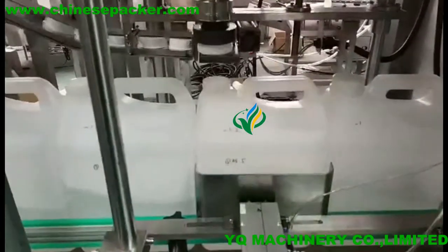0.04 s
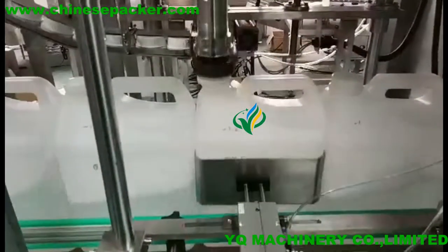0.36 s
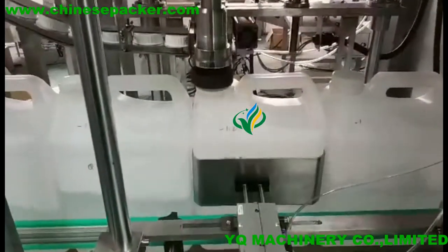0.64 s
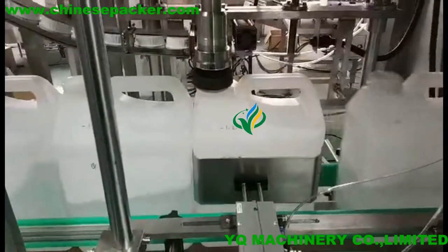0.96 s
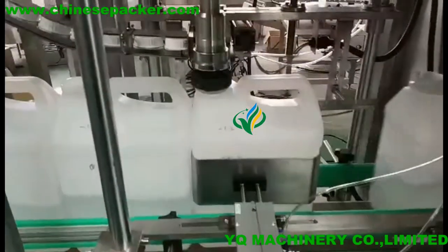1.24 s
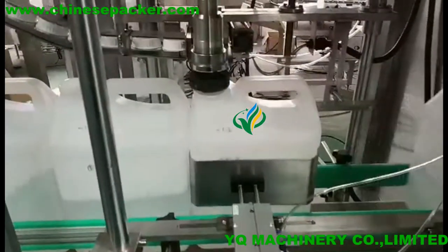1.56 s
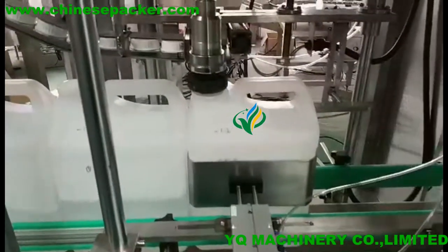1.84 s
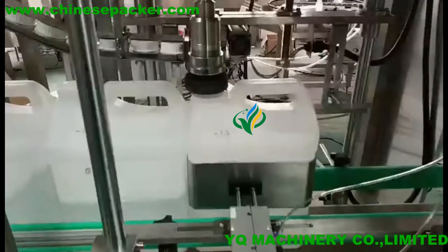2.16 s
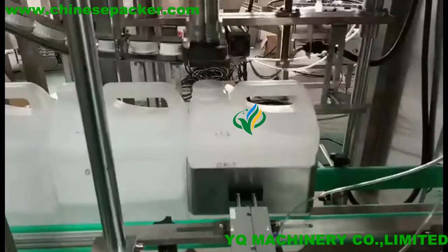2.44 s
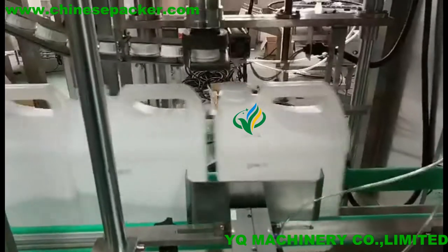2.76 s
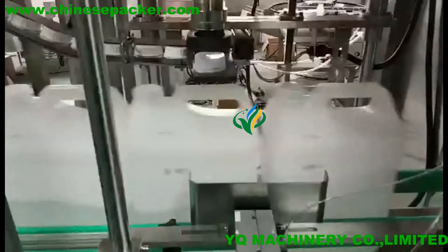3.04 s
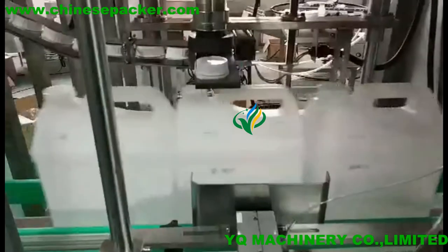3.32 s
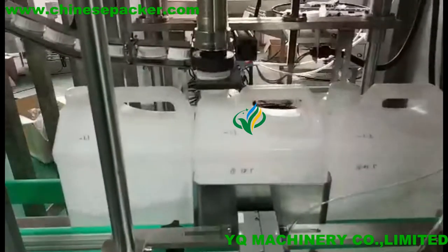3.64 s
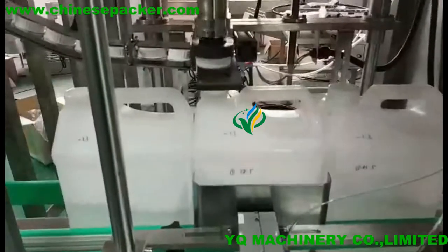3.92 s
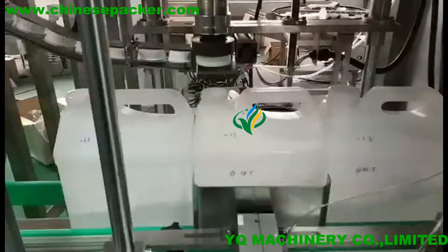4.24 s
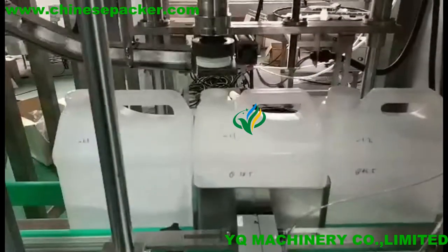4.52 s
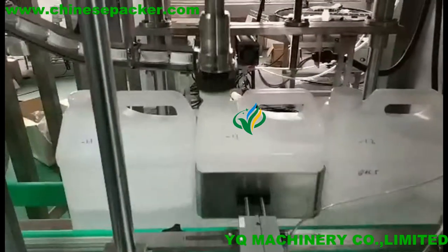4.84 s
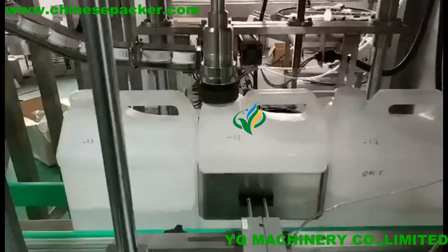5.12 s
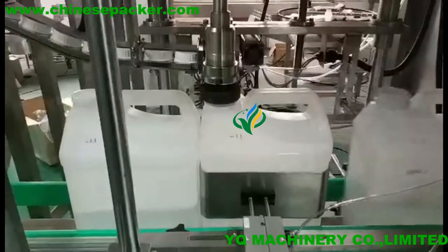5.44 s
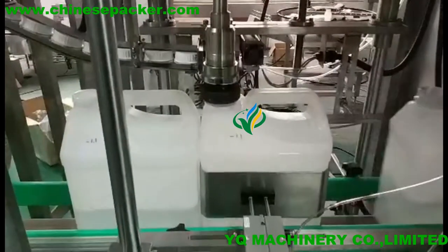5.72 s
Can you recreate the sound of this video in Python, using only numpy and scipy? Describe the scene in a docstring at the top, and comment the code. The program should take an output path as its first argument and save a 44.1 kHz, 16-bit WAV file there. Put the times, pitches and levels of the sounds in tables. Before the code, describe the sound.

A capping machine hisses with short air blasts and knocks against hollow plastic jugs over a humming, rattling conveyor.

```python
"""Pneumatic jug capper, close up

Valves vent one after another through their mufflers, cylinders knock against their stops and the hollow
plastic jugs, and the chuck whirs a cap tight, then squeaks free. The factory conveyor hums and taps
underneath, ducked by the recorder's gain control at each loud sound and swelling back in the pauses."""
import sys
import numpy as np
from scipy import signal
from scipy.fft import rfft, irfft
from scipy.io import wavfile
from scipy.ndimage import uniform_filter1d, map_coordinates

SR = 44100
rng = np.random.default_rng(int(sys.argv[2]) if len(sys.argv) > 2 else 0)


def bounce(signal):
    """Save signal as a 16-bit WAV file at the path given by the first command-line argument."""
    frames = np.transpose(np.atleast_2d(signal))
    limited = np.clip(frames, -1, 1)
    pcm = np.round(limited * 32767).astype(np.int16)
    wavfile.write(sys.argv[1], SR, pcm)


N = 263718
TIME = np.arange(N) / SR
FREQS = np.maximum(np.fft.rfftfreq(N, 1 / SR), 1)


def from_db(db):
    return 10 ** (np.asarray(db) / 20)


def unit_rms(x):
    return x / np.sqrt(np.mean(x ** 2) + 1e-20)


def eq_curve(points):
    """Join (Hz, dB) points into a level in dB at every frequency."""
    hz, db = np.transpose(points)
    return np.interp(np.log(FREQS), np.log(hz), db)


def drift(rate_hz):
    """Smooth random wavering with rms 1."""
    knots = np.arange(0, N, SR / rate_hz / 2)
    return unit_rms(np.interp(np.arange(N), knots, rng.standard_normal(N)[:len(knots)]))


def bandpass(x, low_hz, high_hz):
    sos = signal.butter(2, [low_hz, min(high_hz, .45 * SR)], "band", fs=SR, output="sos")
    return signal.sosfilt(sos, x)


def add(track, start_s, sound):
    """Mix in whatever part of a sound falls within the track."""
    start = round(start_s * SR)
    if -len(sound) < start < N:
        track[max(start, 0):start + len(sound)] += sound[max(-start, 0):N - start]


def ring(force, hz, t60):
    """One mode: a unit click sets a sine of height 1 ringing."""
    r, w = from_db(-60 / (t60 * SR)), 2 * np.pi * hz / SR
    return signal.lfilter([0, np.sin(w)], [1, -2 * r * np.cos(w), r * r], force + 1e-18)


def struck(modes, t60, chatter_s, first_blow, crack_db, band_hz):
    """A blow and its dying chatter ring a set of modes over a dry crack; rms 1 at its loudest."""
    t, (low_hz, high_hz) = TIME[:SR // 3], band_hz
    force = rng.standard_normal(len(t)) ** 3 * np.exp(-t / chatter_s)
    force[0] += first_blow
    rings = 0
    for hz, db in modes:
        gain = from_db(db + rng.normal(0, 3.7)) * rng.choice([-1, 1])
        rings += gain * ring(force, hz * rng.normal(1, 0.028), t60)
    crack = from_db(crack_db) * unit_rms(bandpass(force, low_hz, high_hz))
    hit = bandpass(unit_rms(rings), low_hz / 2, 2 * high_hz) + crack
    return hit / np.sqrt(uniform_filter1d(hit ** 2, size=441).max())


# Stereo image of the noise layers. Each row: frequency in Hz, left-right correlation.
STEREO_CORRELATION = [(90, .88), (170, .997), (400, .985), (3800, .997), (5500, .94), (8000, .78)]


def noise(colour_db):
    """Coloured stereo noise, wider in the treble; rms 1."""
    mid, side = rfft(rng.standard_normal((2, N)))
    alike = np.clip(eq_curve(STEREO_CORRELATION), 0, 1)
    stereo = np.sqrt(1 + alike) * mid + np.sqrt(1 - alike) * side * [[1], [-1]]
    return unit_rms(irfft(from_db(colour_db) * stereo, N))


def turbulence(x, depth_db, patch_hz, patch_s):
    """Patches of the spectrum swell and fade, each on its own; rms 1."""
    bins = signal.stft(x, nperseg=512)[2]
    row, frame = np.indices(bins.shape[1:])
    hz, s = row * SR / 512, frame * 256 / SR
    grid = rng.standard_normal((128, 512))
    patches = map_coordinates(grid, [hz / patch_hz, s / patch_s], order=1, mode="wrap")
    return unit_rms(signal.istft(bins * from_db(depth_db * unit_rms(patches)))[1][:, :N])


def hall(x, t60=0.11, predelay_s=.008):
    """A diffuse, dull tail from the factory walls, different in each ear."""
    t = TIME[:SR]
    decay = from_db(-60 * t / t60) * (t > predelay_s)
    mid, side = bandpass(rng.standard_normal((2, SR)), 133, 9700) * decay
    tail = mid + .5 * side * [[1], [-1]]
    return signal.fftconvolve(x, tail / np.sqrt(np.sum(tail[0] ** 2)), axes=1)[:, :N]


def jug_shake(knock_db=-24, settle_s=0.13, chuck_db=-10.0, scuff_db=-6):
    """Envelope: the jugs settle after each knock, judder under the chuck and jostle as they slide."""
    shake = from_db(chuck_db) * chuck_drive() + from_db(scuff_db) * slide_speed()
    for start, _, db in KNOCKS:
        add(shake, start, from_db(db + knock_db) * np.exp(-TIME[:SR] / settle_s))
    return shake


# The bed: low jug drone and bright link rattle. Each row: frequency in Hz, level in dB.
DRONE_EQ = [(40, -29), (100, -37), (145, -16.5), (185, -3.5), (225, 7.5), (270, -0.5), (350, -8),
            (480, -17.5), (900, -26.5)]
RATTLE_EQ = [(180, -20), (300, -2.5), (510, 0), (599, -2.5), (715, 1.5), (881, -4), (1450, -7.5),
             (3240, -6), (4540, -9.5), (6580, -28), (9830, -13.5), (14000, -26)]


def conveyor(drone_db=-36.0, rattle_db=-28, shaken_rattle_db=-11, throb_db=3.5, grain_db=1.2):
    """Empty jugs drone on the belt while its links rattle; both swell when the jugs are shaken."""
    shake = jug_shake()
    drone_level = np.hypot(from_db(drone_db), shake) * from_db(throb_db * drift(14))
    drone = noise(eq_curve(DRONE_EQ))
    rattle = turbulence(noise(eq_curve(RATTLE_EQ)), depth_db=1.3, patch_hz=180, patch_s=.03)
    rattle_level = np.hypot(from_db(rattle_db), from_db(shaken_rattle_db) * shake)
    return drone_level * drone + rattle_level * from_db(grain_db * drift(60)) * rattle


# Modes of a jug wall, shared by taps, scuffs and knocks. Each row: frequency in Hz, level in dB.
JUG_MODES = [(515, 0), (557.5, 7), (684, 7.5), (729, 3.5), (905, 5.5), (1005, 1), (1252, 2), (1510, -0.5),
             (1692, 2), (1970, -10.5), (400, 1.5), (296, 6.5)]
# With the clamp open the jugs ride free and tap harder: start and end in seconds, boost in dB.
RIDING_FREE = (2.4, 3.4, 4.9)


def link_taps(first_s=.002, every_s=.1263, tap_db=-24.0, uneven_db=2.0, yield_s=0.0086):
    """Each passing belt link taps the jugs softly on the rails, waking only their middle modes."""
    out, (freed, held, boost_db) = np.zeros(N), RIDING_FREE
    for start in np.arange(first_s, N / SR, every_s):
        tap = struck(JUG_MODES[:4], t60=0.081, chatter_s=0.013, first_blow=3.6,
                     crack_db=-7.5, band_hz=(360, 1000))
        db = tap_db + boost_db * (freed < start < held) + rng.normal(0, uneven_db)
        attack = 1 - np.exp(-TIME[:len(tap)] / yield_s)
        add(out, start, from_db(db) * tap * attack)
    return out


# Jugs scuff along as the clamp closes, the chuck lets go or the row moves up.
# Each row: start in seconds, length in seconds, level in dB.
SCUFFS = [(0.418, 0.36, -13.5), (2.033, 0.17, -14.5), (3.274, 0.37, -14), (4.956, 0.36, -13.5)]


def slide_speed():
    """Speed of the jugs against the rails: each scuff swells and eases off."""
    speed = np.zeros(N)
    for start, length, db in SCUFFS:
        add(speed, start, from_db(db) * np.sin(np.pi * TIME[TIME < length] / length))
    return speed


def scuffs(snags_per_s=260, t60=0.037, clatter_db=-8, rub_db=-9, rub_hz=(600, 2600)):
    """A sliding jug rubs and snags; the snags make its walls clatter."""
    snags = (rng.random(N) < snags_per_s / SR) * rng.standard_normal(N)
    clatter = sum(from_db(db) * rng.choice([-1, 1]) * ring(snags, hz, t60) for hz, db in JUG_MODES)
    rub = bandpass(rng.standard_normal(N), *rub_hz)
    return slide_speed() * (from_db(clatter_db) * unit_rms(clatter) + from_db(rub_db) * unit_rms(rub))


def stick_slip(curve, jitter, rough_db, partials):
    """A wavering friction tone along a curve; each partial is a pitch multiple and a level in dB."""
    times, pitches, levels = np.transpose(curve)
    hz, db = np.interp(TIME, times, pitches), np.interp(TIME, times, levels)
    phase = 2 * np.pi * np.cumsum(hz * (1 + jitter * drift(400))) / SR
    tone = sum(from_db(level) * np.sin(k * phase + rng.uniform(0, 2 * np.pi)) for k, level in partials)
    gate = uniform_filter1d(1.0 * ((TIME > times[0]) & (TIME < times[-1])), size=300)
    return gate * from_db(db + rough_db * drift(70)) * unit_rms(tone)


# The seal's gliding voice and its steady upper ring, both played slightly flat.
# Each row: time in seconds, pitch in Hz before detuning, level in dB.
SEAL_GLIDE = [(2.35, 2200, -31), (2.41, 2430, -23), (2.448, 2030, -20), (2.48, 1450, -29), (2.55, 750, -33)]
SEAL_RING = [(2.38, 4620, -21), (2.55, 4550, -25), (2.61, 4500, -32.5)]


def seal_rasp():
    """The seal of the rising cylinder sings; uneven grip spreads each tone into a narrow rush."""
    glide = stick_slip(SEAL_GLIDE, jitter=0.0613, rough_db=2.5, partials=[(0.96, 0)])
    upper = stick_slip(SEAL_RING, jitter=0.016, rough_db=-0.5, partials=[(0.98, 0)])
    return (glide + upper) * drift(260)


# The chuck's squeak, played slightly flat.
# Each row: time in seconds, pitch in Hz before detuning, level in dB.
SQUEAK = [(2.06, 4920, -26), (2.082, 5010, -3), (2.097, 5080, -20), (2.205, 5020, -23.5),
          (2.225, 4880, -32)]
# The jug's groan. Each row: time in seconds, slips per second, level in dB.
GROAN = [(2.184, 186, -12), (2.206, 187, -6.5), (2.245, 178, -19)]
# The groan's timbre. Each row: harmonic number, level in dB.
GROAN_PARTIALS = [(1, -10), (2, -8.5), (3, 6), (4, 0), (5, -2.5), (6, -8)]


def chuck_slip():
    """The chuck squeaks off the cap, and the jug wall groans as it slips."""
    squeak = stick_slip(SQUEAK, jitter=0.0207, rough_db=5, partials=[(0.98, 0)])
    groan = stick_slip(GROAN, jitter=0.026, rough_db=0.5, partials=GROAN_PARTIALS)
    return squeak + groan


# One spin of the chuck per jug. Each row: start in seconds, length in seconds, level in dB.
SPINS = [(0.742, 0.317, -20), (5.239, 0.175, -19)]
# The thread catches at the start, midway and when tight. Each entry: fraction of the spin.
THREAD_CATCHES = [0, 0.505, 0.925]


def chuck_drive(catch_db=4.0, catch_s=0.039, stop_s=0.012):
    """Friction envelope: it swells at each catch of the thread and ends when the cap is tight."""
    drive, t = np.zeros(N), TIME[:SR]
    for start, length, db in SPINS:
        moments = np.multiply(THREAD_CATCHES, length)
        catches = sum((t > at) * np.exp(-np.abs(t - at) / catch_s) for at in moments)
        release = np.exp(-np.maximum(t - length, 0) / stop_s)
        add(drive, start, from_db(db) * (1 + from_db(catch_db) * catches) * release)
    return uniform_filter1d(drive, size=700)


# Colour of the chuck's whir. Each row: frequency in Hz, level in dB.
CHUCK_EQ = [(410, -55), (700, -14), (965, -3.5), (2990, -5.5), (3970, -2.5), (5540, -10), (6390, -17.5),
            (12000, -18), (15600, -47), (22000, -120)]


def chuck_whir(grain_db=3.5, clinks_per_s=28, t60=0.12, clink_db=-3, grind_db=-5, modes=40):
    """The spinning chuck grinds the cap down its thread; each mode of its steel clinks at random."""
    colour, clinks = eq_curve(CHUCK_EQ), 0
    for hz in np.geomspace(900, 7000, modes) * rng.normal(1, 0.0125, modes):
        touches = np.zeros(N)
        moments = np.cumsum(rng.exponential(SR / clinks_per_s, size=200)).astype(int)
        touches[moments[moments < N]] = rng.standard_normal(size=200)[moments < N]
        clinks += from_db(np.interp(hz, FREQS, colour)) * np.sqrt(hz) * ring(touches, hz, t60)
    grind = turbulence(noise(colour), depth_db=6.0, patch_hz=232, patch_s=.04)
    grind *= from_db(grain_db * drift(110))
    return chuck_drive() * (from_db(clink_db) * unit_rms(clinks) + from_db(grind_db) * grind)


# Modes of the steel head. Each row: frequency in Hz, level in dB.
STEEL_MODES = [(2430, -0.5), (2750, 5), (2980, 0.5), (3320, 11), (3490, 0), (3990, 10), (4280, 4),
               (4700, -24), (5300, -17)]
# Recipes for a full-face shove on a jug, a glancing slap, a cylinder's end stop, a steel-on-steel
# ring and the chuck's seat on the neck. Each row: thump in dB, thump in Hz, clack in dB, clink in dB.
CONTACTS = {"shove": (2, 216.5, -6.5, -17.5), "slap": (-2, 220.5, 2, -12), "stop": (-6, 224, 0, -2.5),
            "ring": (0, 210, -20, -2), "seat": (-1.5, 327, -11, -1)}
# The hits. Each row: start in seconds, kind of contact, level in dB.
KNOCKS = [(0.518, "stop", -8), (0.549, "slap", -8.5), (0.733, "seat", 0.5), (0.894, "ring", -13),
          (1.842, "stop", -15.5), (2.051, "stop", -8.5), (2.249, "slap", -9), (2.329, "slap", -7),
          (2.591, "shove", 5.5), (2.618, "shove", 1.5), (3.281, "slap", -15), (3.35, "ring", -7),
          (3.485, "shove", 0), (3.517, "shove", -6), (3.562, "ring", -5), (3.755, "slap", -16),
          (3.976, "shove", -2), (4.006, "shove", -2), (4.424, "stop", -7), (4.441, "slap", -9.5),
          (5.051, "slap", -7), (5.126, "slap", 3), (5.233, "seat", 2)]


def knocks(thump_t60=0.061, swell_s=0.018, yield_s=0.0019):
    """A cylinder lands: steel clinks, the jug wall yields and clacks, and the air inside thumps."""
    out, t = np.zeros(N), TIME[:SR // 3]
    thump_envelope = from_db(-60 * t / thump_t60) * (1 - np.exp(-t / swell_s))
    attack = 1 - np.exp(-t / yield_s)
    for start, contact, db in KNOCKS:
        thump_db, thump_hz, clack_db, clink_db = CONTACTS[contact]
        thump = np.sin(2 * np.pi * thump_hz * t) * thump_envelope
        clack = struck(JUG_MODES, t60=0.04, chatter_s=0.012, first_blow=32,
                       crack_db=-2.5, band_hz=(350, 1580))
        clink = struck(STEEL_MODES, t60=0.11, chatter_s=0.0086, first_blow=26,
                       crack_db=0.5, band_hz=(2360, 5830))
        rings = (from_db(clack_db) * clack + from_db(clink_db) * clink) * attack
        add(out, start, from_db(db) * (from_db(thump_db) * thump / np.abs(thump).max() + rings))
    return out


def pipe_ripple(depth_db=5.5, spacing_hz=71.44, fade_hz=10000):
    """Reflections in the pipes and steel frame ripple the spectrum finely, less so at the top."""
    ripple = np.interp(FREQS / spacing_hz, np.arange(2000), rng.standard_normal(2000))
    return depth_db * ripple / (1 + (FREQS / fade_hz) ** 2)


# The air blasts of one cycle. Each row: valve, start in seconds, level in dB, length in seconds,
# drop by the end in dB (negative swells), opening spurt in dB.
BLASTS = [("lower", 0.5134, -1.3, 0.2185, 1.9, -2.4), ("release", 1.81, -9, 0.28, -4.5, 0.87),
          ("lift", 2.26, -9, 0.32, 9.5, 0), ("clamp", 2.604, -9.5, 0.6, 3.3, 9.4),
          ("clamp", 3.276, -17.5, 0.2, -1.1, 0), ("pick", 3.728, -12.5, 0.233, 10.5, 10.6),
          ("grip", 3.979, -6, 0.356, 1, 0), ("slide", 4.416, -1.5, 0.4516, 0, 1)]
# Short, matching puffs of the slide valve. Each entry: start in seconds.
PUFF_STARTS = [2.226, 3.326, 3.546]
PUFF_DB, PUFF_S = -1, 0.044
CYCLE_S = 4.51   # the valves repeat their sequence for every jug


def airflow(valve, open_s=0.017, shut_s=0.021, spurt_s=0.041, trail_db=-17, trail_s=0.27):
    """Envelope of one valve: it spurts open, sags as its cylinder empties and trails off once shut."""
    flow, t = np.zeros(N), TIME[:SR]
    puffs = [("slide", start, PUFF_DB, PUFF_S, 0, 0) for start in PUFF_STARTS]
    attack = np.sin(np.pi / 2 * np.minimum(t / open_s, 1)) ** 2
    for name, start, level_db, length, sag_db, spurt_db in BLASTS + puffs:
        if name == valve:
            since_shut = np.maximum(t - length, 0)
            trail = from_db(trail_db) * np.exp(-since_shut / trail_s)
            release = np.maximum(np.exp(-since_shut / shut_s), trail)
            db = level_db - sag_db * np.minimum(t / length, 1) + spurt_db * np.exp(-t / spurt_s)
            for cycle in (-1, 0, 1):
                add(flow, start + cycle * CYCLE_S, attack * release * from_db(db))
    return flow


# The hiss of air leaving a muffler. Each row: frequency in Hz, level in dB.
MUFFLER_EQ = [(120, -57), (300, -38), (1500.0, -13.5), (2500.0, -10.5), (3700.0, -1), (5000.0, -4.5),
              (6100.0, -11), (8200.0, -12), (10500.0, -3), (11400.0, -1), (12300.0, 4.5), (14000.0, 1.8),
              (17000, 1), (20000, -9)]
# Peaks and notches of each valve's exhaust path. Each row: centre in Hz, width in Hz, gain in dB.
SLIDE = [(4250, 5400, -11), (4300, 420, 8), (7600, 1000, 2.5), (12200, 2100, -6.5), (16300, 3000, 4.5)]
LOWER = [(2770, 1250, -6), (3770, 1600, 4.5), (4970, 3000, -5.5), (8930, 3800, -8.5), (9700, 440, -4),
         (11400, 1000, -13), (13000, 490, -8), (12740, 300, 3.5)]
RELEASE = [(2070, 720, -10), (4980, 680, 4.5), (6060, 320, -9), (11400, 990, -17), (11500, 4100, 8),
           (13650, 520, 9.5)]
LIFT = [(1960, 2200, 8.5), (4620.0, 270, 0), (10300, 420.0, 4), (11640, 1400, 15.5), (11600, 4200, -13)]
CLAMP = [(2000, 980, -44), (5600, 2100, 1.5), (5960, 270, -9), (9130, 460, 4), (9260.0, 3200, -7.5),
         (9790.0, 410, 9), (11320, 620, -22), (14300, 3700, -11.5)]
PICK = [(2320, 1700, 8), (7850, 2300, 4), (10620, 1150, -16), (10630, 1850, 19), (12130.0, 270, 4.5)]
GRIP = [(2850, 1100, 6), (5360, 680, 8.5), (6600, 490, 8.5), (7300, 1300, 6), (10920, 1200, 8.5),
        (11600, 500, -24), (12000, 440, 10), (13200, 480, 8), (13770, 490, 17.5)]
# Each entry: valve name, its exhaust path from above.
VALVES = {"slide": SLIDE, "lower": LOWER, "release": RELEASE, "lift": LIFT, "clamp": CLAMP, "pick": PICK,
          "grip": GRIP}


def exhausts(flutter_db=1.5):
    """Air vents through the mufflers, coloured by each valve's path, sputtering and fluttering."""
    hiss = 0
    for valve, path in VALVES.items():
        path_db = sum(db * np.exp(-(2 * (FREQS - hz) / width) ** 2) for hz, width, db in path)
        hiss += airflow(valve) * noise(eq_curve(MUFFLER_EQ) + path_db + pipe_ripple())
    sputter = turbulence(hiss, depth_db=3.0, patch_hz=240.4, patch_s=.028)
    return np.std(hiss) * sputter * from_db(flutter_db * drift(22))


def scene(hall_db=-29.5):
    """The mix: contacts with a touch of hall, air blasts a hair to the right, conveyor underneath."""
    contacts = knocks() + link_taps() + scuffs() + seal_rasp() + chuck_slip() + chuck_whir()
    pan = from_db([[-.27], [.27]])
    return contacts + from_db(hall_db) * hall(contacts) + pan * exhausts() + conveyor()


def gain_control(x, threshold_db=-22.5, slope=0.48, release_db_per_s=20.0):
    """Loud sounds duck the gain at once; it creeps back up, so the conveyor swells in the pauses."""
    power = np.abs(uniform_filter1d(np.mean(x ** 2, axis=0), size=600))
    level_db = 10 * np.log10(power + 1e-12)
    fall_db = release_db_per_s * TIME
    held_db = np.maximum.accumulate(level_db + fall_db) - fall_db   # peak hold that sinks steadily
    over_db = uniform_filter1d(np.maximum(held_db - threshold_db, 0), size=300)
    return x * from_db(-slope * over_db)


def record(dry, ceiling=.8, bass_cut_hz=135, hiss_edge_hz=14300):
    """Ducks loud sounds, rounds the peaks, thins the bass and trims the highest hiss."""
    ridden = gain_control(dry)
    rounded = ridden / (1 + (ridden / ceiling) ** 4) ** .25
    thin = signal.sosfilt(signal.butter(2, bass_cut_hz, "high", fs=SR, output="sos"), rounded)
    return signal.sosfilt(signal.ellip(14, .1, 85, hiss_edge_hz, fs=SR, output="sos"), thin)


dry = scene()
out = record(dry)
bounce(out)
```